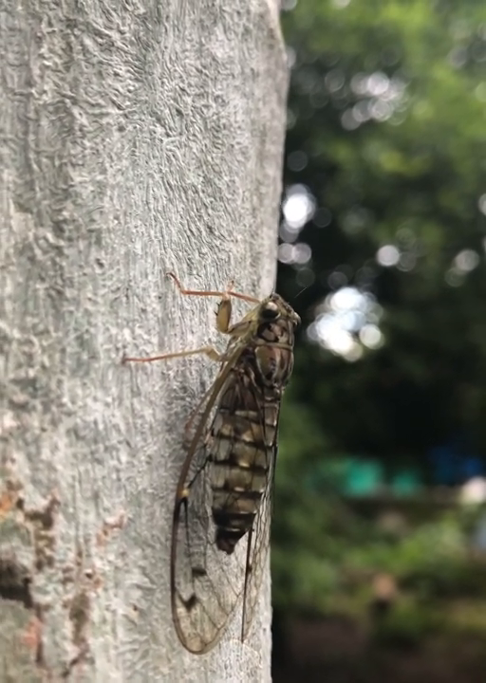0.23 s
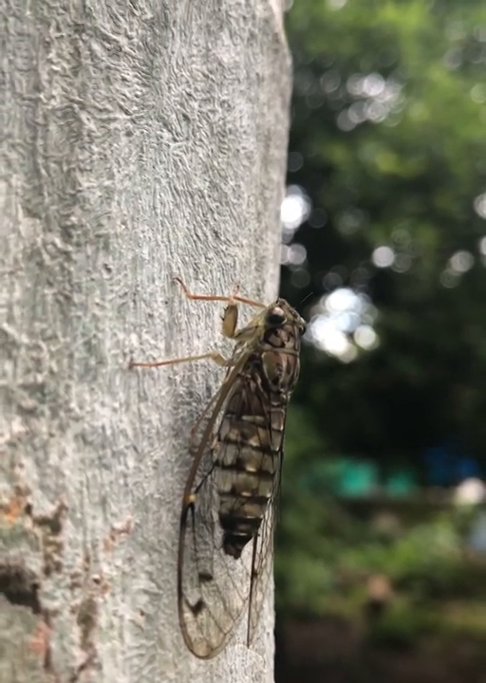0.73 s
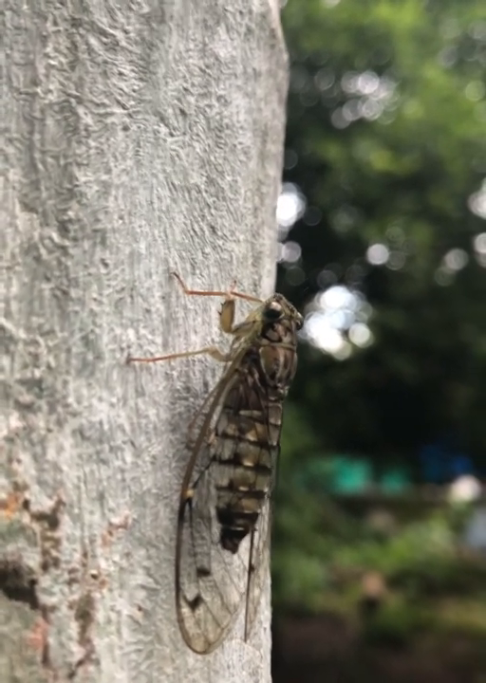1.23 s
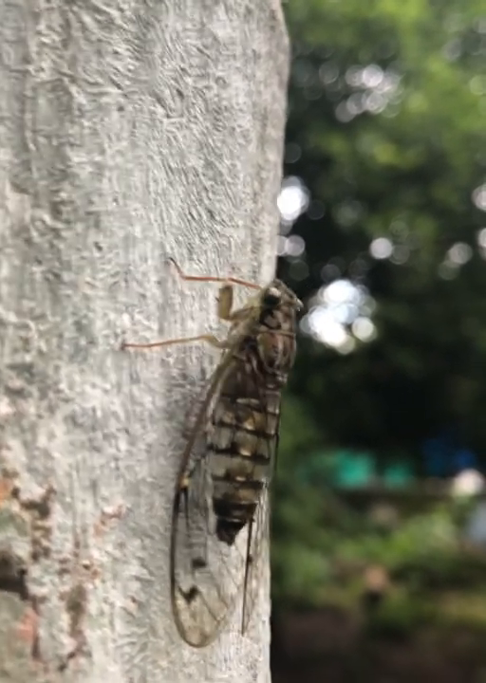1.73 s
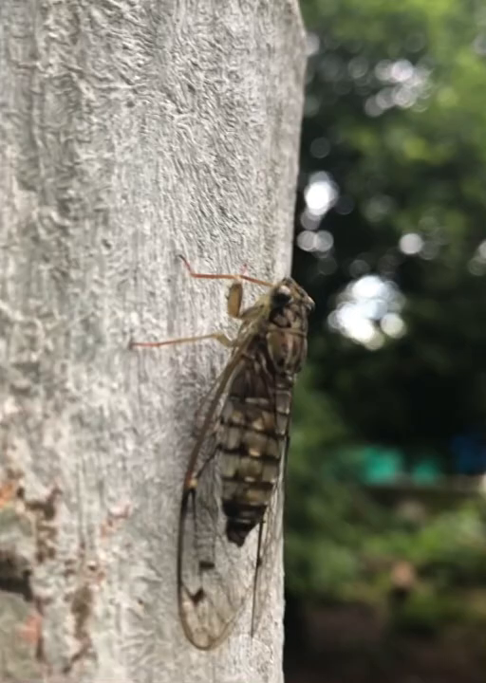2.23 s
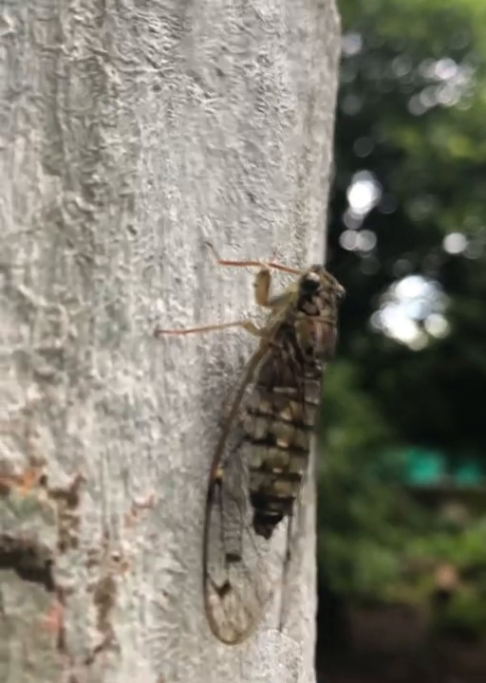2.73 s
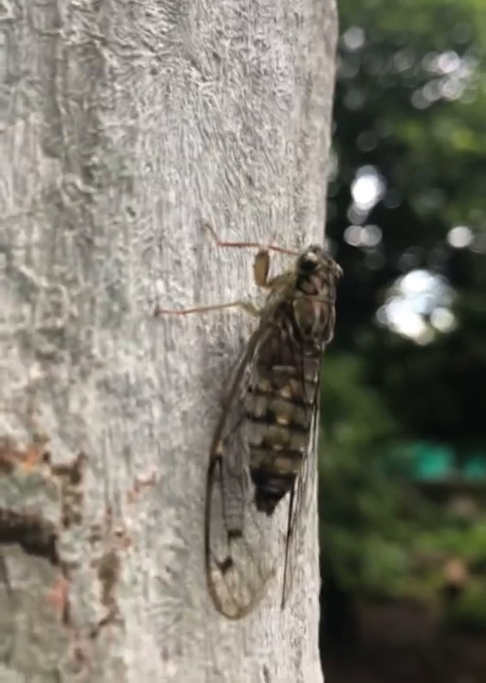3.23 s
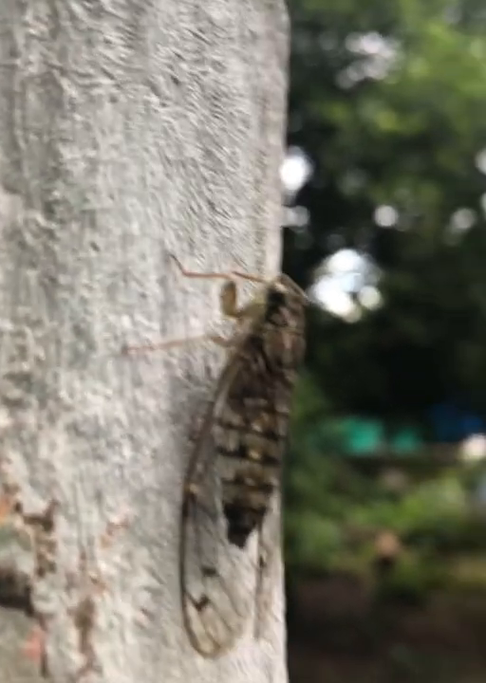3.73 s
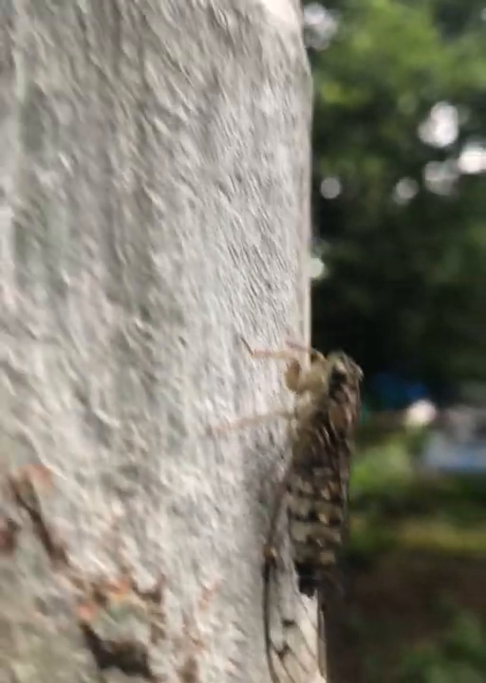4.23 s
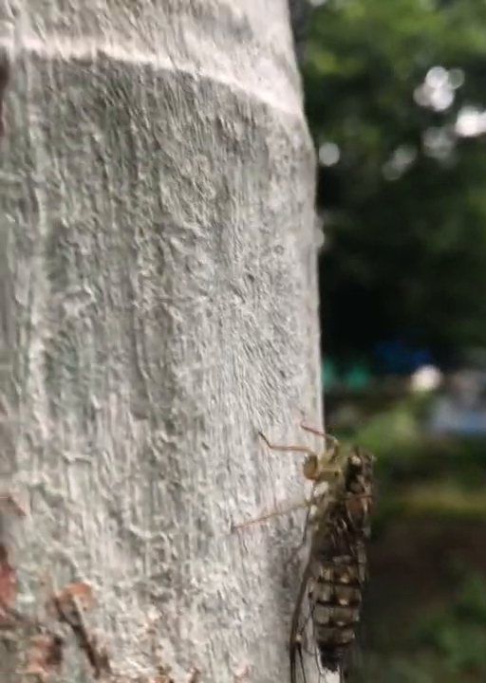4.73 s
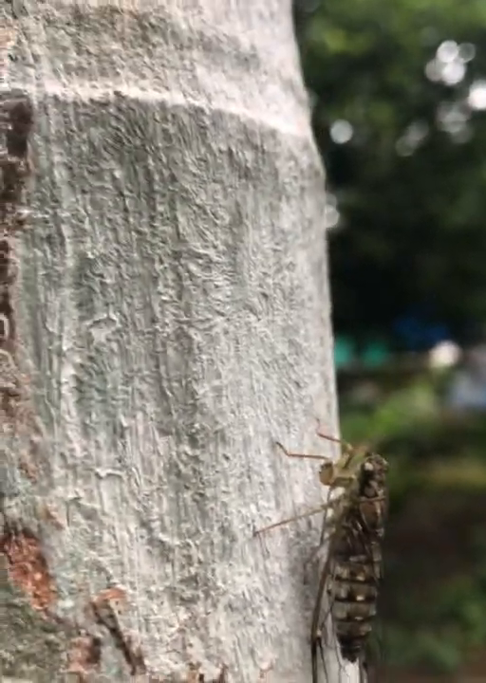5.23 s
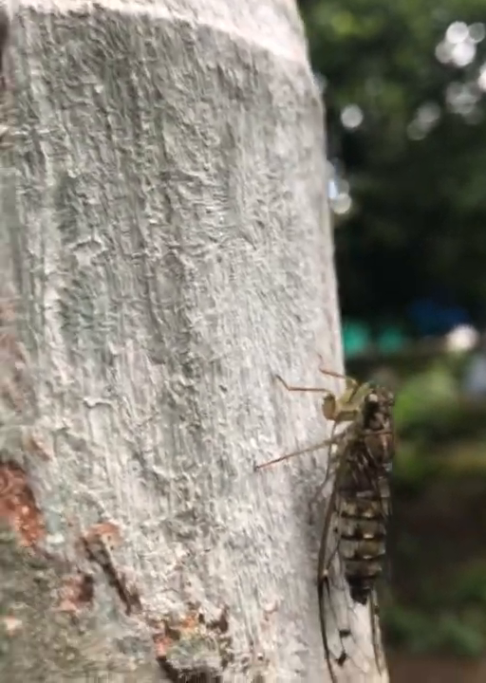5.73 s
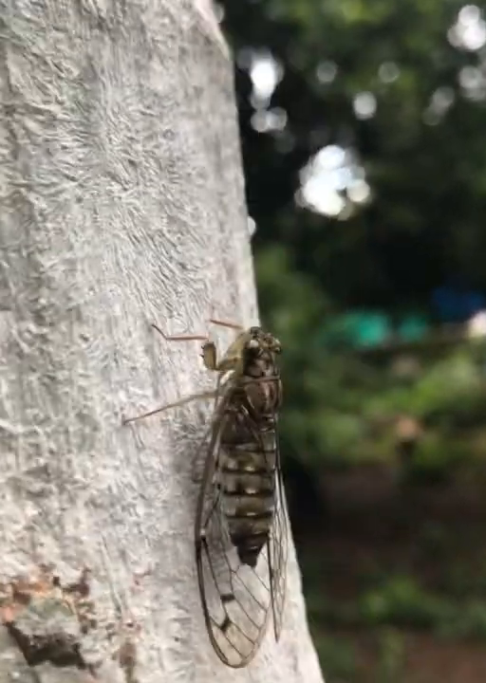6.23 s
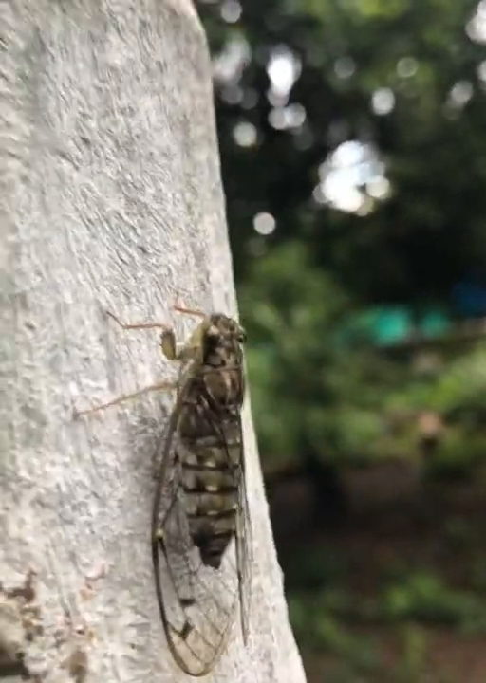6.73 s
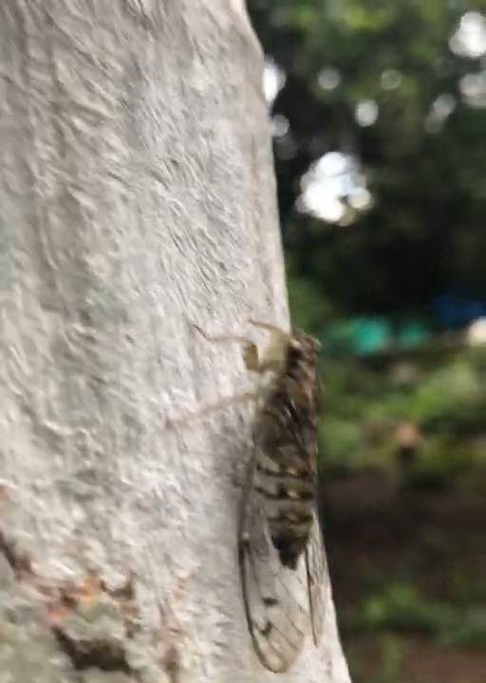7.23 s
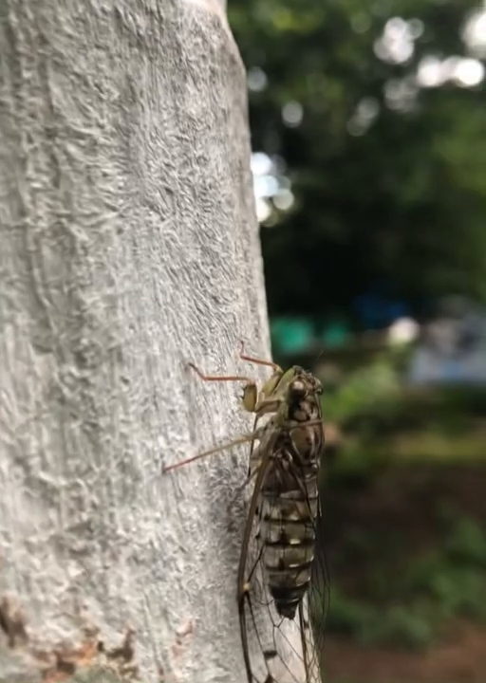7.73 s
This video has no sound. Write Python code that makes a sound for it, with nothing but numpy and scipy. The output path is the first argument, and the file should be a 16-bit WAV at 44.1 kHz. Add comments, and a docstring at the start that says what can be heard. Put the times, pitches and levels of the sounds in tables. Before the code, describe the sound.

Very close and almost without echo, a cicada gives a piercing, raspy buzz that throbs about seven times a second. After about three seconds it turns into a stutter of short chirps, growing slower and quieter, before brief louder bursts return at the end. The garden around it stays faint, with a shimmering chorus of other cicadas, an occasional distant crow caw and a low hum of town.

```python
"""A cicada in a garden

A cicada sings on a tree trunk, a hand's width away. It clicks by snapping the ribs of its tymbals, two
small drum plates. Each click is a short shrill note whose fourth partial (four times its pitch) rings in
the hollow belly. The clicks come in swelling phrases, break into chirps that slow and fade, then start
to swell again. Other cicadas, a far crow and a low town rumble fill the garden."""
import sys
import numpy as np
from scipy import signal
from scipy.fft import rfft, irfft, next_fast_len
from scipy.io import wavfile
from scipy.ndimage import uniform_filter1d, minimum_filter1d, map_coordinates

SR = 44100
rng = np.random.default_rng(int(sys.argv[2]) if len(sys.argv) > 2 else 0)


def digitize_waveform(pressure):
    """Quantize a signal to 16-bit integers and store it at the path in sys.argv[1].

    Rows of a 2-D input are taken as channels; values are limited to [-1, 1].
    """
    field = np.atleast_2d(pressure).T
    bounded = np.clip(field, -1, 1)
    quanta = np.round(bounded * 32767).astype(np.int16)
    wavfile.write(sys.argv[1], SR, quanta)


N = 351918
TIME = np.arange(N) / SR


# the tone as the insect shifts its belly: t/s, base level/dB of partials 1, 2 and 3,
# level/dB of the high partials compared with the fourth
TONE = [(0, -23, -29, -29, -25.5), (2.6, -25.5, -32, -35, -29), (3.2, -24.5, -28.5, -36, -28.5),
        (4, -26, -27.5, -33, -29), (4.4, -26.5, -29, -30, -24), (5.3, -24.5, -24.5, -25, -28),
        (6.2, -24, -22, -26, -28.5), (6.6, -25, -25, -35, -31), (7.3, -27.5, -25.5, -31, -25),
        (7.9, -26.5, -28.5, -31, -26)]
# how unevenly the ribs snap: t/s, phase jitter/rad, rasp level/dB
ROUGHNESS = [(0, 0.036, -30.5), (3.3, 0.012, -32.5), (4.2, 0.035, -30), (5, 0.076, -31), (5.8, .12, -27),
             (7, 0.048, -29.5)]
# partials above the belly's ring: multiple of the pitch, extra level/dB
HIGH_PARTIALS = [(5, 1), (6, 2.5), (7, -4.5)]

def cicada(scatter_s=.00008, size_db=1.43, colour_db=2.0, rise_ms=0.66, fall_ms=0.93, choke=4,
           loose_kick_rad=.45, locked_kick_rad=.12, loose_glide=0.0057, locked_glide=0.0099,
           taut_hz=2185, taut_db_per_hz=0.0677, accent_share=0.51, lift_db=2.17, fresh_db=5):
    """Snapping ribs make each click a stack of partials, built on the snap rate and gliding upward."""
    s, db, hz = np.array(sorted(phrase_clicks() + chirp_clicks())).T[:, :, None]
    luck = rng.standard_normal((2000, 10))[:len(s)].T[:, :, None]  # ten random numbers per click
    first_db, second_db, third_db, high_db = read(TONE, s)
    jitter, rasp_db = read(ROUGHNESS, s)
    accent_db = accent_share * np.maximum(db - read(LOUDNESS, s)[0], 0)
    # a tight tymbal favours its first partial over its second
    taut_db = taut_db_per_hz * np.maximum(hz - taut_hz, 0)
    # the clicks that open and close a burst, and how fresh from a pause each click is
    opens = np.diff(s, axis=0, prepend=-1) > .013
    closes = np.roll(opens, -1, axis=0)
    fresh = np.exp(-(s - np.maximum.accumulate(s * opens)) / .03)
    # loud clicks lock to the ringing belly, which steadies their phase; quiet ones stay loose
    lock = step(db + 4)
    kick = np.interp(lock, (0, 1), (loose_kick_rad, locked_kick_rad))
    glide = loose_glide + (locked_glide - loose_glide) * lock
    s = s + scatter_s * luck[0]
    db = db + (size_db + 3 * jitter) * luck[1]

    # one row of samples for each click
    index = np.round(s * SR).astype(int) + np.arange(-SR // 400, SR // 70)
    ms = (index / SR - s) * 1000
    inside = (index >= 0) & (index < N)
    index = np.clip(index, 0, N - 1)

    def place(rows):
        """Add every click to one track at its own time."""
        return np.bincount(index.ravel(), (rows * inside).ravel(), N)

    # the phase runs on from click to click, bends within each and trembles from rib to rib
    running = (2 * np.pi * np.cumsum(np.interp(TIME, s[:, 0], hz[:, 0])) / SR)[index]
    rad_per_ms = 2 * np.pi * hz / 1000
    upward = glide * (np.sqrt(1 + np.minimum(ms, 2) ** 2) - 1)
    bend = rad_per_ms * (.004 * luck[2] * ms + upward)
    smooth = running + kick * luck[3] + bend
    phase = smooth + jitter * wobble(2000)[index]

    # the belly rings; uneven snaps drive it for a shorter time
    ring = bell(ms * (1 + 2.1 * jitter), rise_ms, fall_ms)
    clicks = amp(db) * ring * np.sin(4 * phase)
    for (k, extra_db), chance in zip(HIGH_PARTIALS, luck[7:]):
        clicks += amp(db + high_db + extra_db + colour_db * chance) * ring * np.sin(round(k) * phase)

    # the plate sounds the first partial, the snap the third
    choked_ms = ms * (1 + choke * jitter)
    plate_db = first_db - 3 + accent_db + taut_db + lift_db * lock + size_db * luck[4]
    clicks += amp(plate_db) * tymbal_plate(smooth, rad_per_ms * ms, choked_ms)
    snap = bell(ms + 0.52, rise_ms=0.66, fall_ms=2.14)
    clicks += amp(third_db - 4 + colour_db * luck[6]) * snap * np.sin(3 * phase)

    # the second partial flares after a pause, broken up by loose clicks, then settles to a whistle
    slip = (1 - lock) * (0.51 * luck[3] + 0.023 * rad_per_ms * 2 * np.tanh(ms / 2))
    whistle_db = second_db - 1.5 + fresh_db * fresh * (1 - lock) - taut_db / 2 + size_db * luck[5]
    whistle = bell(choked_ms + .2, rise_ms=.7, fall_ms=1.9)
    clicks += amp(whistle_db) * whistle * np.sin(2 * (running + slip))
    flick = closing_flick(running + slip, rad_per_ms, ms, jitter)
    clicks += closes * amp(second_db - 10 - 2 * taut_db) * flick

    rasp = rib_rasp(place(amp(rasp_db + accent_db) * snap))
    thump = air_thump(place((amp(db) * ring) ** 2))
    return place(clicks) + rasp + thump


# the song as it tires and the microphone draws back: t/s, level/dB
LOUDNESS = [(0, 1.5), (4.08, 0), (4.25, -7), (4.55, -7), (4.75, -9), (5.3, -7), (5.55, -8.5), (6.1, -9.5),
            (6.35, -10.5), (6.65, -10), (6.85, -15), (7.05, -12), (7.3, -17.5), (7.6, -17.5), (7.85, -12.8)]
# the tymbal muscles slacken: t/s, pitch f/Hz, average click gap/ms
PACE = [(2.8, 2192, 3.88), (3.5, 2185, 5.31), (4.1, 2166, 5.42), (5, 2103, 6.85), (5.6, 2071, 6.44),
        (5.9, 2088, 6.66), (6.5, 2032, 6.67), (7.9, 2017, 7.87)]
# runs of evenly spaced chirps: start t/s, period/ms, number of chirps, clicks in each
CHIRP_RUNS = [(2.7866, 48, 3, 7), (2.9295, 46, 4, 6), (3.1145, 45.2, 7, 5), (3.43, 43.4, 2, 4),
              (3.5184, 46.8, 2, 5), (3.6105, 47.3, 6, 4), (3.897, 49.4, 6, 4), (4.198, 53.5, 4, 4),
              (4.4158, 57.7, 4, 4), (4.6415, 63.3, 5, 4), (4.9615, 61.2, 7, 4), (5.3955, 69.8, 7, 4),
              (5.8894, 68.5, 4, 4), (6.1765, 75.8, 3, 4), (6.412, 78.5, 4, 3), (6.8134, 82, 2, 5),
              (6.9745, 75.3, 5, 4), (7.5095, 82, 2, 5), (7.806, 44, 3, 4), (7.932, 24, 2, 3)]

def chirp_clicks(slowing=0.29):
    """List clicks as (t/s, level/dB, f/Hz): a handful per chirp, each gap longer than the last."""
    rows = []
    for start, period_ms, chirps, clicks in CHIRP_RUNS:
        progress = np.linspace(0, 1, clicks)
        for s in start + np.arange(chirps) * period_ms / 1000:
            db, = read(LOUDNESS, s)
            hz, gap_ms = read(PACE, s)
            times = s + (clicks - 1) * gap_ms / 1000 * progress * (1 - slowing * (1 - progress))
            rows += [(t, db, hz) for t in times]
    return rows


# the three tunes of a phrase: opening f/Hz, swollen f/Hz
RISING, LEVEL, LOW = (2158, 2234), (2172, 2176), (2143, 2143)
# long phrases, mostly in rounds of three: start t/s, end t/s, tune
PHRASES = [(.004, .089, LOW), (.111, .241, RISING), (.285, .394, LEVEL), (.421, .552, RISING),
           (.595, .703, LEVEL), (.729, .821, LOW), (.856, .953, RISING), (.996, 1.098, LEVEL),
           (1.132, 1.232, LOW), (1.272, 1.37, RISING), (1.418, 1.519, LEVEL), (1.554, 1.642, LOW),
           (1.681, 1.777, RISING), (1.82, 1.92, LEVEL), (1.951, 2.03, LOW), (2.068, 2.172, RISING),
           (2.211, 2.302, LEVEL), (2.335, 2.4, LOW), (2.441, 2.538, RISING), (2.577, 2.65, LEVEL),
           (2.679, 2.765, RISING)]
# late surges, slow clicks with a louder ending: start t/s, end t/s, extra level/dB
SURGES = [(6.691, 6.741, 1), (7.352, 7.431, 6), (7.658, 7.749, 13)]

def phrase_clicks(opening_db=-7.5, opening_gap_ms=5.05, swollen_s=.042, growth=0.0075,
                  surge_gap_ms=10, accent_s=0.0164, hz_per_db=7):
    """List the clicks of the opening phrases, whose loud endings grow longer, and of the late surges."""
    rows = []
    for start, end, tune in PHRASES:
        db, = read(LOUDNESS, start)
        swell = end - swollen_s - growth * start
        rows += phrase(start, end, swell, opening_gap_ms, db + opening_db, db, *tune)
    for start, end, accent_db in SURGES:
        db, = read(LOUDNESS, start)
        hz, _ = read(PACE, start)
        accent_hz = hz + hz_per_db * accent_db
        rows += phrase(start, end, end - accent_s, surge_gap_ms, db, db + accent_db, hz, accent_hz)
    return rows


def phrase(start, end, swell, slow_ms, soft_db, loud_db, low_hz, high_hz,
           fast_ms=3.75, limp=0.18, hurry_s=.022, swell_s=0.0071, droop=0.0098):
    """List one phrase as (t/s, level/dB, f/Hz): clicks hurry, swell and rise in pitch, then droop."""
    rows, s, side = [], start, 1
    while s < end + fast_ms / 2000:
        effort = step((s - swell) / swell_s)
        tiring = np.clip((s - swell) / (end - swell), 0, 1) ** 2
        tension = step((s - swell) / hurry_s + 1.5)  # the pitch climbs ahead of the swell
        hz = (low_hz + (high_hz - low_hz) * tension) * (1 + droop * effort * (.5 - tiring))
        rows.append((s, soft_db + (loud_db - soft_db) * effort, hz))
        gap_ms = slow_ms + (fast_ms - slow_ms) * step((s - swell) / hurry_s + .5)
        s += max(gap_ms * (1 - side * limp), 1) / 1000
        side = -side  # left and right tymbal take turns, slightly out of step
    return rows


def tymbal_plate(phase, click_phase, ms, sharp=0.031):
    """The plate starts before the belly and rings longer, a little above the click's pitch."""
    return bell(ms + 1.0, rise_ms=0.9, fall_ms=1.93) * np.sin(phase + sharp * click_phase)


def closing_flick(phase, rad_per_ms, ms, jitter, delay_ms=4.2, width_ms=2.1):
    """After the last click of a burst, the slackening plate flicks down in pitch."""
    sag = .0035 * rad_per_ms * np.maximum(ms, 0) ** 2
    envelope = np.exp(-18 * jitter) * np.exp(-.5 * ((ms - delay_ms) / width_ms) ** 2)
    return envelope * np.sin(2 * (phase - sag))


# the colour of the rasp: f/Hz, level/dB
RASP_SPECTRUM = [(700, -37), (1400, -16.5), (2000, -3), (2550, -0.5), (3300, -9.5), (4500, 1.5),
                 (5300, 0.5), (6500, 3), (8000, 7.5), (10300, 7.5), (12000, -9), (14300, -3), (15500, -11),
                 (16800, -13.5)]

def rib_rasp(envelope):
    """The snapping ribs add a puff of bright noise to each click."""
    return envelope * noise(RASP_SPECTRUM)


def air_thump(power, gain_db=-48.5, low_hz=135, high_hz=290):
    """The strongest snaps also push a little air: a faint hum at the click rate."""
    def band(hz):
        return step((hz - low_hz) / 20) * step((high_hz - hz) / 30) * 190 / (hz + 1)
    return amp(gain_db) * filtered(power, band)


def near_reflections(x, t60=0.015):
    """The trunk and the hand scatter the song for a few milliseconds."""
    t = np.arange(SR // 20) / SR
    tail = rng.standard_normal(len(t)) * amp(-60 * t / t60)
    return signal.fftconvolve(x, tail / np.linalg.norm(tail))[:N]


# far calls, mostly a crow: start t/s, length/s, f/Hz, level/dB
CAWS = [(-.3, 0.366, 586, -53), (1.844, 0.5, 598, -62), (3.265, 0.096, 1101, -59.5),
        (3.769, 0.66, 606, -64), (4.683, 0.193, 855, -70), (6.196, 0.76, 424, -68), (6.202, 1.5, 1212, -69),
        (7.728, 0.37, 628, -52.5)]

def crow(fall=0.055, overtone_db=-6, hoarse=0.053):
    """Hoarse falling calls, each with a fainter second partial; a faint tone near 1.2 kHz lingers over the low
    call at 6.2 s."""
    out = np.zeros(N)
    waver = hoarse * wobble(170)
    for s, length, hz, db in CAWS:
        progress = np.clip((TIME - s) / length, 0, 1)
        phase = 2 * np.pi * np.cumsum(hz * (1 + fall * (.5 - progress) + waver)) / SR
        envelope = np.sqrt(np.abs(np.sin(np.pi * progress)))
        out += amp(db) * envelope * (np.sin(phase) + amp(overtone_db) * np.sin(2 * phase))
    return out


# the background's loudness: t/s, chorus level/dB, rumble level/dB
GARDEN_LEVELS = [(0, -39.5, -61), (2, -43.5, -60.5), (3.3, -48.5, -61), (4.5, -50, -63), (5.15, -46, -58.5),
                 (6.3, -42.5, -57), (8, -45.5, -56.5)]
# the colour of the cicada chorus: f/Hz, level/dB
CHORUS_SPECTRUM = [(1500, -32.5), (2200, -11.5), (2440, 0), (2680, -46), (3600, -24), (4400, -11),
                   (4720, -10), (5300, -22), (7100, -20), (8500, -6.5), (9550, 9.5), (10400, -34),
                   (12800, -25), (14250, -18), (16000, -45)]
# the colour of the town rumble: f/Hz, level/dB
RUMBLE_SPECTRUM = [(20, -32), (35, -16), (62, -1), (130, -5), (300, -11.5), (600, -12), (1200, -18),
                   (3000, -30), (12000, -34)]

def garden():
    """A shimmering chorus of far cicadas over the rumble of the town."""
    chorus_db, rumble_db = read(GARDEN_LEVELS, TIME)
    shimmer_db = .8 * wobble(7) + 1.2 * wobble(90)
    chorus = amp(chorus_db + shimmer_db) * noise(CHORUS_SPECTRUM)
    rumble = amp(rumble_db + wobble(16)) * noise(RUMBLE_SPECTRUM)
    return chorus + rumble


# how long sound lingers among the trees: f/Hz, time to fade by 60 dB/s
TREE_DECAY = [(300, 3), (1500, 0.95), (5000, 0.79), (12000, 0.09)]

def tree_echoes(x):
    """The trees return a blur of echoes in which high sounds die first."""
    hz, t, spectra = signal.stft(rng.standard_normal(SR), SR, nperseg=256)
    fade = amp(-60 * t / along(TREE_DECAY, hz)[:, None])
    tail = signal.istft(spectra * fade, SR, nperseg=256)[1]
    return signal.fftconvolve(x, tail / np.linalg.norm(tail))[:N]


def bell(ms, rise_ms, fall_ms):
    """A click's loudness over time: it builds while the ribs snap, then rings out."""
    rise = np.exp(-.5 * (ms / rise_ms) ** 2)
    fall = np.exp(1 - np.sqrt(1 + (ms / fall_ms) ** 2))
    return np.where(ms < 0, rise, fall)


def amp(db):
    """Turn decibels into a gain."""
    return 10 ** (np.asarray(db) / 20)


def unit(x):
    """Scale to an average strength (rms) of 1."""
    return x / np.sqrt(np.mean(x ** 2) + 1e-20)


def along(points, hz):
    """Read (f/Hz, value) points on a log frequency axis."""
    f, v = np.transpose(points)
    return np.interp(np.log(hz + 1), np.log(f + 1), v)


def read(rows, when):
    """Read each column of a table at the given times."""
    s, *cols = np.transpose(rows)
    return [np.interp(when, s, c) for c in cols]


def wobble(rate):
    """A smooth curve of rms 1 through `rate` random points a second."""
    return unit(map_coordinates(rng.standard_normal(N // 8), [TIME * rate], mode="wrap"))


def filtered(x, response):
    """Scale each frequency in x by response(hz)."""
    size = next_fast_len(N + SR // 2)
    return irfft(rfft(x, size) * response(np.fft.rfftfreq(size, 1 / SR)), size)[:N]


def noise(spectrum):
    """Noise of rms 1 with the given colour."""
    return unit(filtered(rng.standard_normal(N), lambda hz: amp(along(spectrum, hz))))


def step(u):
    """A smooth step from 0 to 1 around u = 0."""
    return (1 + np.tanh(u)) / 2


def scene(reflections_db=-21, song_echo_db=-39):
    """The near singer has almost no echo; the crow is all echo."""
    song = cicada()
    far = tree_echoes(amp(song_echo_db) * song + crow())
    return (song + amp(reflections_db) * near_reflections(song) + far + garden())[None]


def record(dry, ceiling=.94, top_hz=16200):
    """A gentle limiter turns down the loudest clicks; the microphone cuts off the highest treble."""
    needed = np.minimum(1, ceiling / (np.abs(dry[0]) + 1e-9))
    held = minimum_filter1d(needed, size=240)
    gain = uniform_filter1d(uniform_filter1d(held, size=100), size=100)
    return filtered(dry[0] * gain, lambda hz: 1 / np.sqrt(1 + (hz / top_hz) ** 160))[None]


dry = scene()
out = record(dry)
digitize_waveform(out)
```